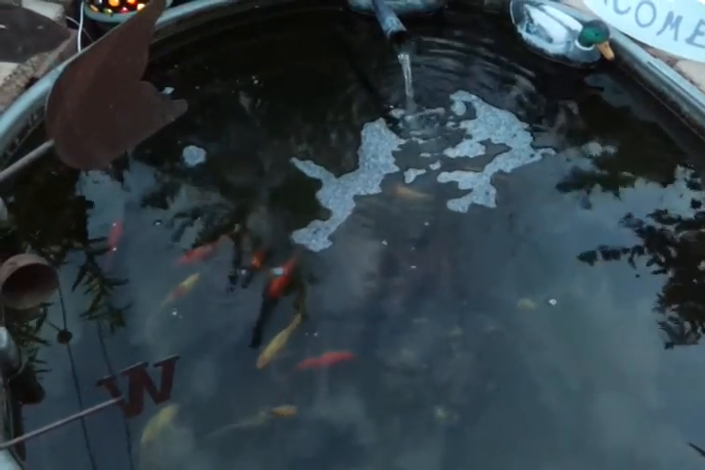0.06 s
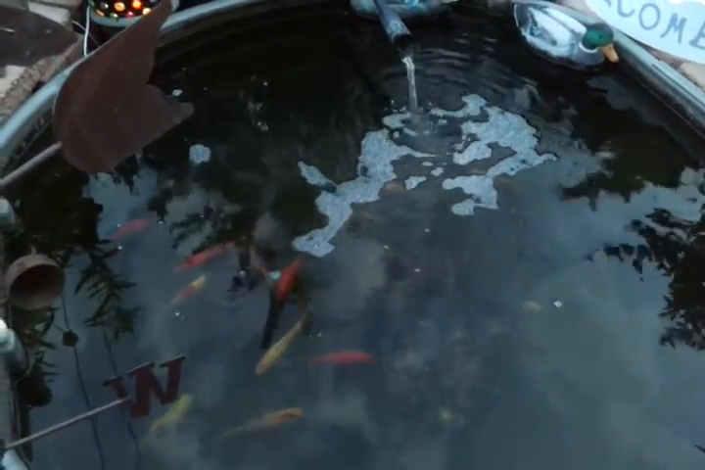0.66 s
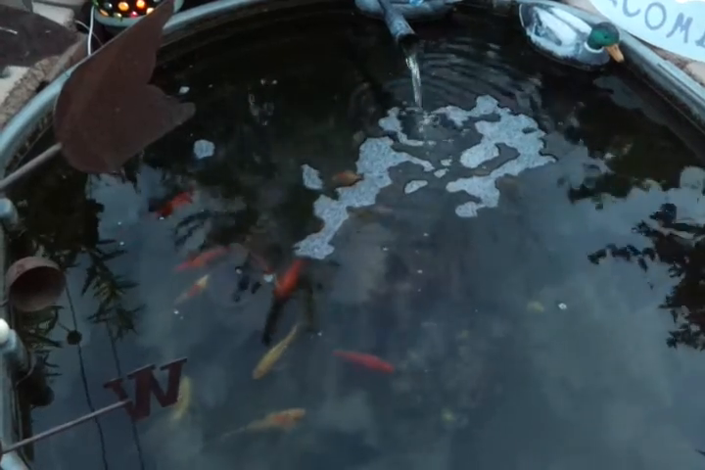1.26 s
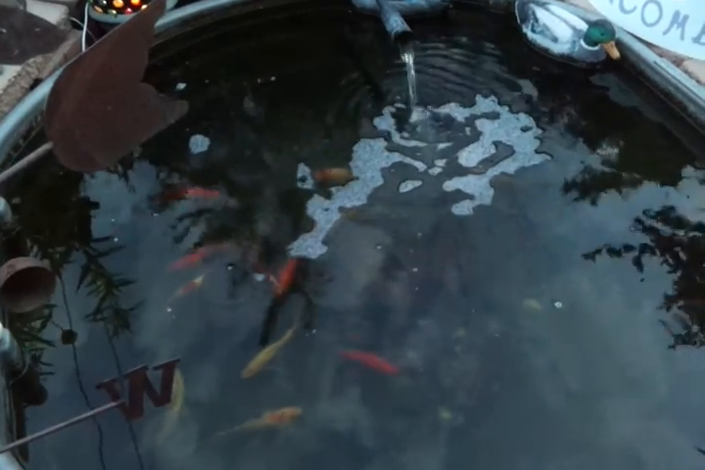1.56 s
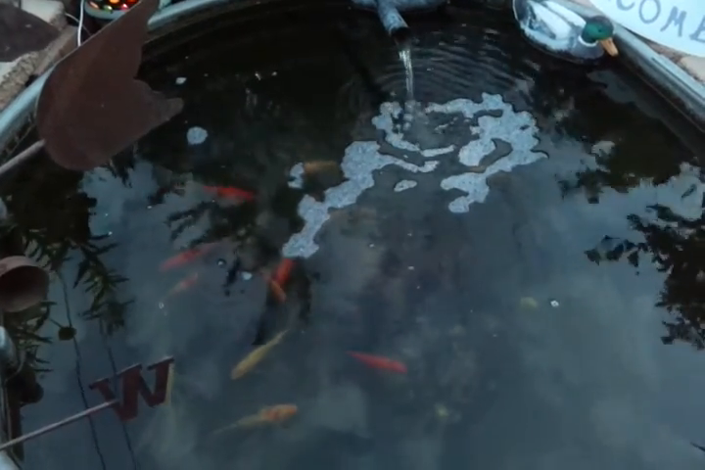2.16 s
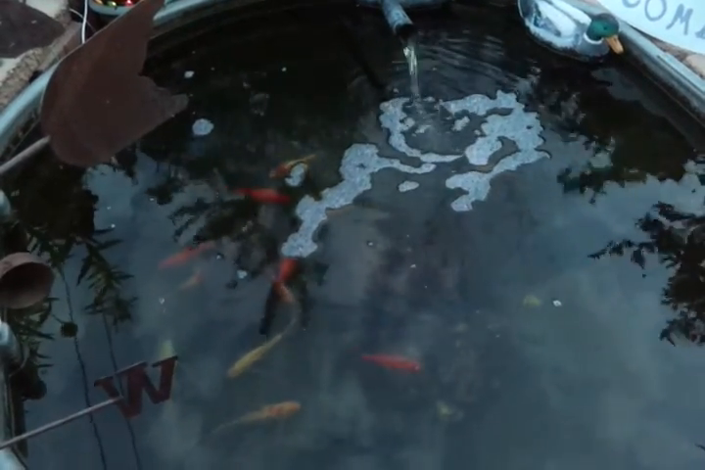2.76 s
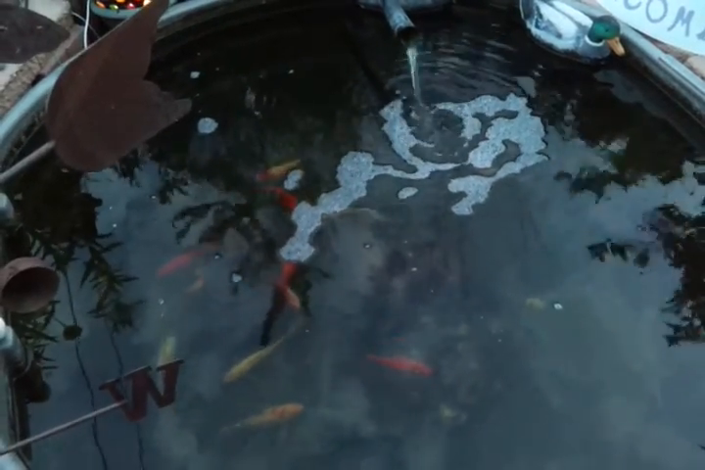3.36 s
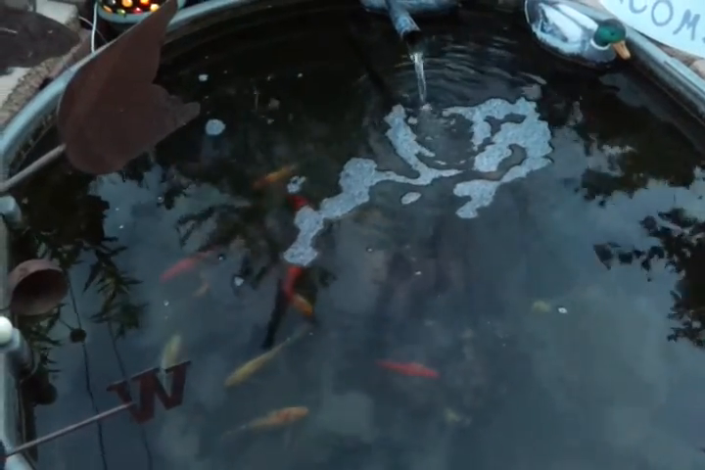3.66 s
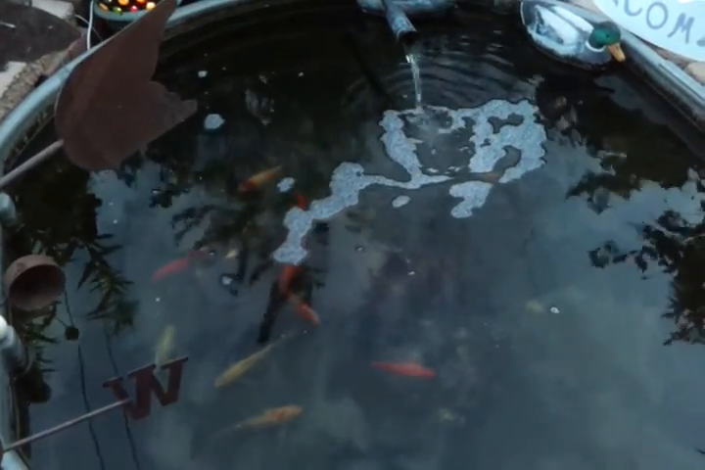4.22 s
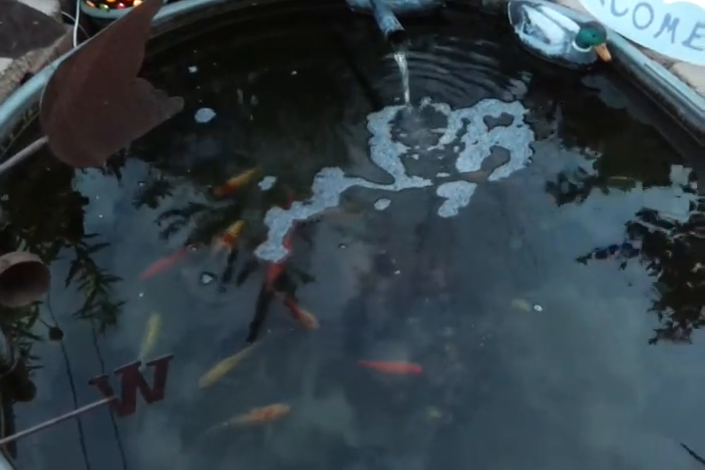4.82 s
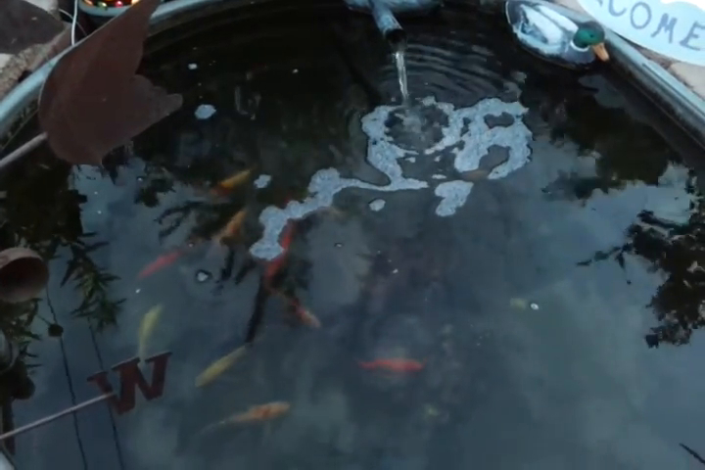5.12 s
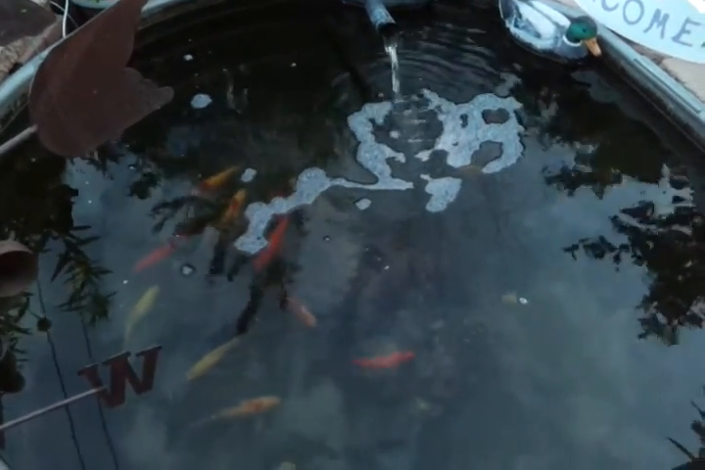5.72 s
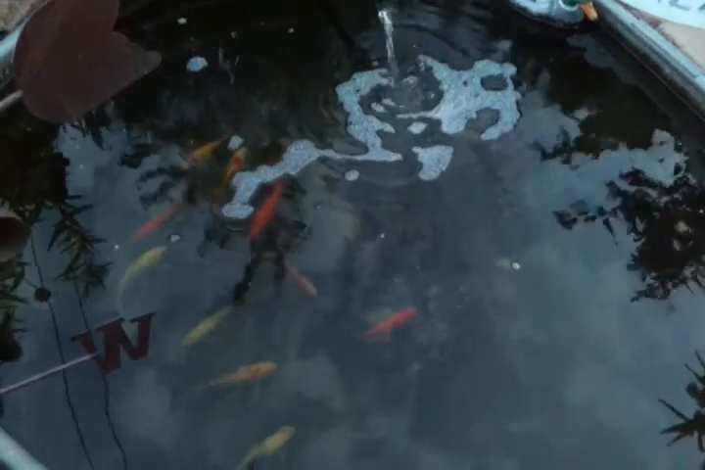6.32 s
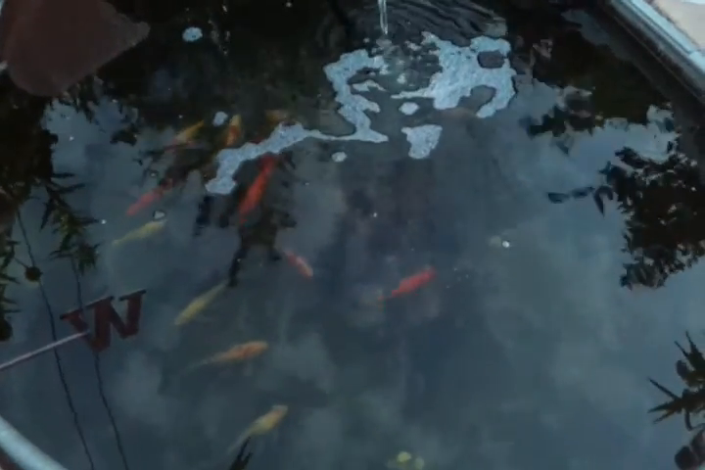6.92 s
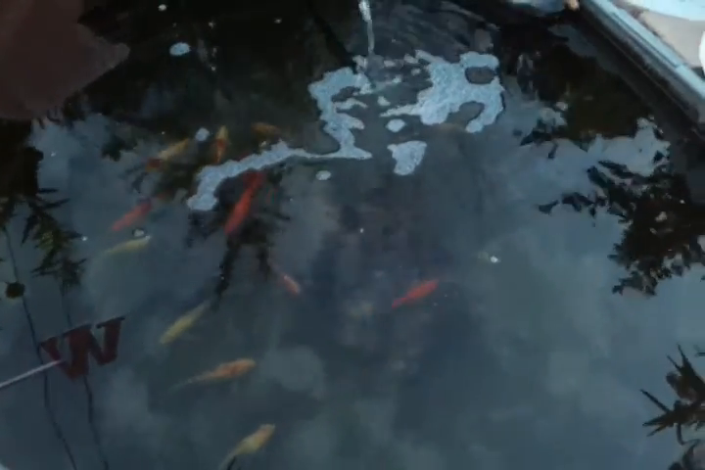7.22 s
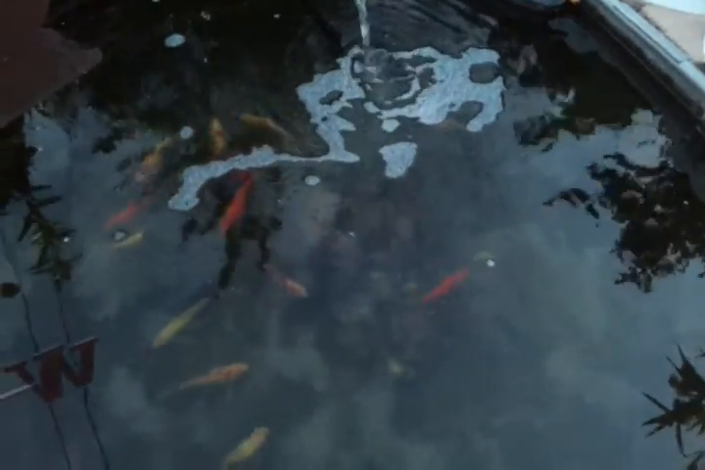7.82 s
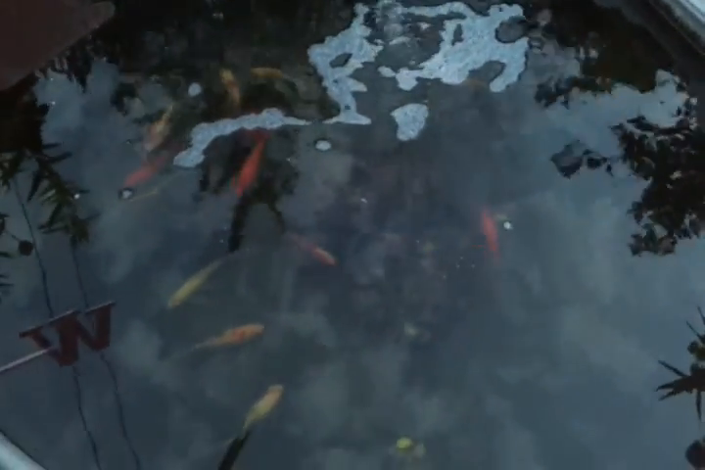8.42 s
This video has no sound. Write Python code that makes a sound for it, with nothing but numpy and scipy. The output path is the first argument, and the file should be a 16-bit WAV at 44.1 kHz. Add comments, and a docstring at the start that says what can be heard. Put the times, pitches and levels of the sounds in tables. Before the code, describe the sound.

From the start, a thin stream of water trickles from a spout into a small garden pond, close to the microphone, and runs for the whole eight and a half seconds. It breaks into irregular drops, each a light spatter with a bright, high ping; the sharpest come at about 0.8 and 1.1 seconds, with others near 3.2, 5.9 and 8.3. Small splats and lower bubbles plink and gurgle among them, rising slightly in pitch. The basin gives the water a brief, slightly hollow ring. Underneath, a pump hums quietly with a faint, steady whine in a soft outdoor rumble. From about 4 seconds a distant vehicle drones past, strongest between 4.4 and 5.2 seconds, and fades by about 6.5. The trickle carries on unchanged to the end.

```python
"""From the start a pump hums and a faint whine holds, while close by a thin stream trickles from a
spout into a small garden pond. It breaks into drops: each spatters, and a tiny bubble of air
resonates with a ping. Now and then a gulp splats, and larger bubbles plink, rising in pitch.
The basin rings and its hard rim echoes the water. Midway a far vehicle drones past and fades,
and the stream runs on."""
import sys
import numpy as np
from scipy import signal
from scipy.fft import rfft, irfft, next_fast_len
from scipy.io import wavfile
from scipy.ndimage import map_coordinates

SR = 44100
rng = np.random.default_rng(int(sys.argv[2]) if len(sys.argv) > 2 else 0)


def dump_mix(stems):
    """Bounce the given channels to the path in sys.argv[1] as a 16-bit WAV at rate SR."""
    frames = np.atleast_2d(stems).T  # one column per channel
    limited = np.clip(frames, -1, 1)  # hard clip at full scale
    pcm = np.round(limited * 32767).astype(np.int16)
    wavfile.write(sys.argv[1], SR, pcm)


N = 373968
TIME = np.arange(N) / SR

# The loudest drops; a few rows, set about 3 ms before a loud drop, give that drop's stronger lead tick # as a
# ping of its own. Each row: time in seconds, ping level in dB, ping pitch in Hz, spray level in dB, # slap
# level in dB.
DROPS = [(0.1559, -10.5, 5310, -26.5, -44), (0.184, -25.5, 5030, -41, -60), (0.218, -24.5, 5800, -48, -56),
         (0.3813, -15.5, 5550, -33, -64), (0.438, -25.5, 5750, -44, -53), (0.585, -25.5, 4500, -44, -56),
         (0.6463, -22.5, 5520, -43, -53), (0.7183, -14.5, 5650, -40, -53), (0.7716, -11.5, 5390, -36, -50),
         (0.7746, -2.5, 5870, -21.5, -42.5), (0.9, -31, 5500, -33.5, -58), (0.9722, -22, 6250, -44, -54),
         (0.9806, -22, 5270, -28.5, -43.5), (1.056, -3.5, 5540, -33, -36.5), (1.1785, -24, 5340, -39, -52),
         (1.3832, -16, 5320, -27, -43), (1.4217, -26, 5800, -34, -41.5),
         (1.5232, -25.5, 5660, -31.5, -41.5), (1.543, -27, 5250, -37, -58.5), (1.5998, -9, 5430, -34, -53),
         (1.641, -21, 5370, -49, -47), (1.844, -25.5, 5230, -34.5, -53), (1.933, -30, 5630, -35, -55),
         (2.0734, -31.5, 5550, -34.5, -40.5), (2.191, -24, 5420, -34, -45), (2.243, -29.5, 5360, -42, -56),
         (2.4004, -10.5, 5600, -31, -45), (2.443, -20.5, 5600, -47, -58), (2.461, -22.5, 5980, -41, -51),
         (2.671, -22.5, 5740, -39, -62), (2.746, -23.5, 5760, -44, -40.5), (2.784, -23.5, 5640, -39, -49),
         (2.8176, -22.5, 5400, -45, -58), (2.8204, -17, 5200, -32.5, -59),
         (2.8607, -17, 5500, -29.5, -42.5), (2.902, -27, 4680, -39, -56), (2.9254, -22, 5400, -45, -42.5),
         (2.9418, -17.5, 5400, -41, -50), (2.9733, -19, 5650, -27, -49), (2.989, -22.5, 5200, -45, -59),
         (3.0485, -24.5, 5440, -31.5, -48), (3.1272, -18.5, 4680, -32.5, -44), (3.139, -25, 5400, -33, -45),
         (3.1585, -15.5, 5860, -37, -63), (3.1976, -21, 5600, -34, -42), (3.2355, -10, 5560, -36, -45.5),
         (3.3297, -27.5, 5720, -30, -40), (3.4905, -22, 6000, -40, -63), (3.56, -20, 4560, -47, -63),
         (3.5707, -11, 5500, -48, -60), (3.6782, -23, 5840, -31.5, -47), (3.745, -26, 5700, -39, -60),
         (3.914, -30, 5300, -33, -44), (4.0406, -20, 5350, -34, -44), (4.151, -15.5, 5430, -24.5, -40.5),
         (4.2453, -24, 5500, -26.5, -45), (4.322, -26, 5560, -35, -60), (4.277, -25, 5250, -39, -61),
         (4.343, -24.5, 5430, -54, -57), (4.4079, -16, 6200, -52, -45.5), (4.485, -25.5, 5550, -36, -42),
         (4.5516, -21, 5350, -28.5, -60), (4.835, -25, 5500, -34.5, -43.5), (4.875, -27.5, 5840, -45, -53),
         (4.902, -24, 5150, -41, -43), (4.913, -24, 5900, -38, -49), (4.9689, -38, 5330, -32, -44),
         (5.026, -19, 5530, -36.5, -51), (5.074, -24, 5500, -38, -50), (5.163, -12, 5850, -28, -54),
         (5.297, -22.5, 5510, -43.5, -62), (5.395, -27, 5180, -35, -44), (5.4142, -12, 5430, -49, -49.5),
         (5.6833, -19.5, 5200, -49, -61), (5.6869, -10, 5440, -26, -50), (5.737, -29.5, 5950, -40, -47),
         (5.821, -17.5, 5010, -31, -44.5), (5.865, -25, 5850, -34, -57), (5.8777, -8.5, 5430, -30, -44),
         (5.9146, -30, 5850, -45, -64), (6.0083, -22, 4800, -34, -45), (6.038, -20.5, 5150, -33, -40.5),
         (6.0506, -26, 5600, -38, -66), (6.162, -21, 5380, -46, -43), (6.303, -30, 5630, -40, -43),
         (6.3768, -22, 5170, -26.5, -42), (6.454, -24, 5260, -37.5, -54), (6.6051, -21, 5390, -27.5, -58),
         (6.6121, -18.5, 5100, -26, -54), (6.797, -30.5, 5370, -36.5, -47), (6.832, -24.5, 5200, -42, -64),
         (6.8502, -16.5, 5270, -31, -47), (7.1675, -18.5, 5290, -30.5, -48.5),
         (7.2232, -23.5, 5014, -33, -57), (7.242, -20.5, 5140, -27, -53), (7.3148, -14.5, 5160, -41, -54),
         (7.3478, -15, 5100, -33, -63), (7.4146, -16.5, 5760, -52, -41.5), (7.47, -15, 5320, -28, -47),
         (7.5, -27, 5730, -41, -41.5), (7.618, -29, 5350, -38, -46), (7.8389, -13.5, 5500, -63, -44),
         (7.932, -27, 5670, -47, -53), (8.044, -20, 5200, -55, -54), (8.229, -18, 4910, -44, -42),
         (8.2812, -8, 5540, -29, -58)]
# Spectrum of water slapping water. Each row: frequency in Hz, gain in dB.
SLAP_SPECTRUM = [(150, -12), (400, -6), (780, 2), (1100, 2), (1290, -7.5), (1500, 1.5), (2100, -1),
                 (2450, 1.5), (2750, -9), (3300, -0.5), (3900, -2), (4800, -18), (7000, -39.5)]


def gain_of(db):
    """Decibels to amplitude."""
    return 10 ** (np.asarray(db) / 20)


def unit_rms(x):
    """Normalisation to rms 1."""
    return x / np.sqrt(np.mean(x ** 2) + 1e-20)


def curves(rows):
    """Linear interpolation of a table through time."""
    s, *columns = np.transpose(rows)
    return [np.interp(TIME, s, c) for c in columns]


def add(mix, s, sound):
    """Superposition: a sound joins the mix from second s."""
    part = mix[max(round(s * SR), 0):][:len(sound)]
    part += sound[:len(part)]


def coloured(x, points):
    """Spectral shaping by (Hz, dB) points."""
    hz, db = np.transpose(points)
    size = next_fast_len(len(x))
    f = np.fft.rfftfreq(size, 1 / SR)
    response = gain_of(np.interp(np.log(f + 1), np.log(hz), db))
    return irfft(rfft(x, size) * response, size)[:len(x)]


def wander(hz):
    """Low-pass noise of rms 1 and bandwidth about hz."""
    size, rate_hz = 8192, 800
    f = np.fft.rfftfreq(size, 1 / rate_hz)
    slow = irfft(rfft(rng.standard_normal(size)) * np.exp(-.5 * (f / hz) ** 2))
    return unit_rms(np.interp(TIME, np.arange(size) / rate_hz, slow))


def wavering_tone(hz, width_hz, flutter_db):
    """Random modulation of pitch and strength broadens a spectral line."""
    phase = 2 * np.pi * np.cumsum(hz + 0.403 * width_hz * wander(width_hz)) / SR
    return unit_rms(gain_of(flutter_db * wander(width_hz)) * np.sin(phase))


def background(air_db=-50, whine_hz=1767, whine_db=-64):
    """Line spectra over broadband noise: the pump's hum and a thin whine in the outdoor rumble."""
    # Each row: frequency in Hz, gain in dB.
    air_spectrum = [(20, -16.5), (32, -14.5), (45, 0.5), (62, -2), (90, 2), (110, -3.5), (145, -1.5),
                    (235, -5), (290, -8.5), (400, -10.5), (600, -16.5), (1200, -17.5), (3000, -29),
                    (6000, -41.5), (7500, -55.5)]
    # Each row: frequency in Hz, line width in Hz, rms level in dB.
    pump_tones = [(46.6, 4, -66), (75.8, 2.94, -50.5), (119.4, 5, -60), (152, 6.2, -62.5),
                  (169.7, 4.1, -64), (235.6, 2, -62)]
    air = gain_of(air_db) * unit_rms(coloured(rng.standard_normal(N), air_spectrum))
    hum = sum(gain_of(db) * wavering_tone(hz, width, flutter_db=2.0) for hz, width, db in pump_tones)
    whine = np.sqrt(2) * np.sin(2 * np.pi * whine_hz * TIME + 0.72 * wander(1.8))
    return air + hum + gain_of(whine_db) * whine


def impacts(per_s, spread_db):
    """Shot noise: random clicks of either sign, many small and a few large."""
    when, sign, size = rng.random((round(per_s * N / SR), 3)).T
    db = spread_db * np.minimum(-np.log(1 - size), 3.5)
    out = np.zeros(N)
    out[(when * N).astype(int)] = np.sign(sign - .5) * gain_of(db)
    return out


def ring(hz, peak_s, rise_per_s=0, order=2):
    """Bubble resonance: trapped air acts as a spring, and its pitch may climb as it nears the surface."""
    t = np.arange(0, 8 * peak_s, 1 / SR)
    age = t / peak_s
    envelope = (age * np.exp(1 - age)) ** order
    return envelope * np.sin(2 * np.pi * hz * (t + rise_per_s * t ** 2 / 2))


def pings(per_s=480, pitch_hz=(4100, 5250, 6500), spread_db=3.6, rise_per_s=5):
    """Tiny bubbles resonate, each at its own pitch, so densely that they fuse."""
    out = np.zeros(N)
    for when, a, b, size, length, glide in rng.random((round(per_s * N / SR), 6)):
        hz = np.interp((a + b) / 2, [0, .5, 1], pitch_hz)
        swell_s = .0006 * 4 ** length
        gain = gain_of(-spread_db * np.log(0.049 + size)) / swell_s ** 0.097
        add(out, when * N / SR, gain * ring(hz, swell_s, rise_per_s * glide ** 2, order=3))
    return unit_rms(out)


def plink(hz, cycles, rise, onset_s=.0013, wobble_db=2.0, wobble_cycles=9):
    """Damped oscillation: a larger bubble pinches off, glides up and flutters as its shape wobbles."""
    n = np.arange(0, 5 * cycles, hz / SR)  # time in periods
    pace, start = rng.random((2, 3, 1))
    wobble = np.sin(2 * np.pi * (n / wobble_cycles * (.5 + pace) + start)).sum(0)
    onset = 1 - np.exp(-(n / hz / onset_s) ** 2)
    envelope = gain_of(wobble_db * wobble) * onset * np.exp(-n / cycles)
    return envelope / envelope.max() * np.sin(2 * np.pi * n * (1 + rise * n / cycles / 2))


def gurgle(per_s=190, spread_db=4.5, cycles=11, candidates=4000):
    """Weak bubbles of all sizes churn under the stream: the larger, the lower the resonance."""
    # Each row: share of bubbles below this pitch, pitch in Hz, relative level in dB.
    bubble_sizes = [(0, 480, -5), (.15, 850, -3), (.27, 1100, -3), (.37, 1600, -2), (.48, 2150, 1),
                    (.64, 2500, 3), (.77, 2900, 2), (.92, 3400, 3), (1, 4300, 3)]
    share, pitch_hz, size_db = np.transpose(bubble_sizes)
    out = np.zeros(N)
    for when, which, size, length, glide, chance in rng.random((candidates, 6)):
        if chance < per_s * N / SR / candidates:
            db = np.interp(which, share, size_db) - spread_db * np.log(0.16 + size)
            hz = np.interp(which, share, pitch_hz)
            add(out, when * N / SR, gain_of(db) * plink(hz, cycles * (.5 + length), 0.085 * glide ** 3))
    return unit_rms(out)


def trickle(fizz_db=-4.5, ping_db=-1.2, patter_db=-7.5, gurgle_db=-6.0, clump_db=5.5, clump_hz=40):
    """Amplitude modulation: as the stream wobbles, droplets tick, patter and ping in clumps."""
    # Each row: time in seconds, level of fizz and pings in dB, level of patter and gurgle in dB.
    flow = [(0.0, -45, -51.5), (0.54, -45.5, -48), (1.46, -46, -50.5), (1.67, -49, -54), (2.19, -48, -48.5),
            (2.63, -45, -50), (3.04, -46, -50), (3.36, -48, -49.5), (6.9, -46, -50), (7.46, -43.5, -48),
            (7.65, -46, -48.5), (8.45, -45.5, -51)]
    # Each row: frequency in Hz, gain in dB.
    fizz_spectrum = [(2000, -42.5), (3800, -38), (4400, 3), (5000, 2), (5600, 6.5), (6200, 0.5), (6800, -4),
                     (7600, -16.5)]
    high_db, low_db = curves(flow)
    clumps = gain_of(clump_db * np.clip(wander(clump_hz), -2, 1))
    fizz = unit_rms(coloured(impacts(per_s=2200, spread_db=2.0) * clumps, fizz_spectrum))
    patter = unit_rms(coloured(impacts(per_s=1000, spread_db=1.4) * clumps, SLAP_SPECTRUM))
    high = gain_of(fizz_db) * fizz + gain_of(ping_db) * unit_rms(pings() * clumps)
    low = gain_of(patter_db) * patter + gain_of(gurgle_db) * gurgle()
    return gain_of(high_db) * high + gain_of(low_db) * low


def spatter(pitch_hz, ring_s, scatter_s, count):
    """A cluster of tiny bubble resonances within milliseconds, the late ones weaker."""
    out = np.zeros(SR // 20)
    for a, b, size, pitch, length in rng.uniform(.03, 1, (count, 5)):
        hz = np.interp(pitch, [0, .5, 1], pitch_hz)
        delay_s = -scatter_s * np.log(a * b)
        add(out, delay_s, size * (a * b) ** 0.077 * ring(hz, ring_s * (.5 + length)))
    return out / np.sqrt(np.sum(out ** 2) / 400)  # the energy of 9 ms at rms 1


def small_drops(drip_s=.09, ping_db=-28.5, spray_db=-43, slap_db=-52, spread_db=2.0, ping_hz=5450):
    """Jet breakup sheds a drop about every drip_s: rows for the lesser ones between those of DROPS."""
    loud = [0] + [row[0] for row in DROPS] + [N / SR]
    times = np.concatenate([np.linspace(a, b, round((b - a) / drip_s) + 1)[1:-1]
                            for a, b in zip(loud, loud[1:])])
    deviations = rng.standard_normal((len(times), 5)).clip(-2, 2)
    return [(s + 0.32 * drip_s * late, ping_db + spread_db * ping, ping_hz * (1 + 0.05 * pitch),
             spray_db + spread_db * spray, slap_db + spread_db * slap)
            for s, (late, ping, pitch, spray, slap) in zip(times, deviations)]


def drops(ping_db=-2.1, spray_db=-2.6, slap_db=-6.5, tick_db=-18, hard_db=-13):
    """Transients: each drop gives a faint tick, a slap and a spray, then a louder ping 3 ms later."""
    lead_s, tick_s, splash_s, snap_s = .003, .0005, .0023, .00078
    out, t = np.zeros(N), np.arange(SR // 20) / SR
    push = t / splash_s * np.exp(-t / splash_s)
    push /= np.sqrt(np.mean(push[:400] ** 2))
    for s, peak_db, hz, bright_db, dull_db in list(DROPS) + small_drops():
        length, force, tone = 1 + .22 * rng.uniform(-1, 1, 3)
        swell_s = length * snap_s * (1 + max(hard_db - peak_db, 0) / 20)  # gentle drops ring longer
        slap = 1.37 * push * unit_rms(coloured(rng.standard_normal(len(t)), SLAP_SPECTRUM))
        slap += 0.57 * spatter([1700, 2900, 4000], ring_s=.0012, scatter_s=splash_s, count=4)
        # the bubbles of one drop are alike in size
        spray = spatter([hz - 900, hz + 50, hz + 950], ring_s=.00078, scatter_s=splash_s, count=11)
        tick = force ** 2 * ring(hz * np.sqrt(tone), tick_s, order=4)
        ping = ring(hz, swell_s, rise_per_s=3.3, order=5)
        add(out, s - lead_s - tick_s, gain_of(peak_db + tick_db) * tick)
        add(out, s - lead_s, gain_of(dull_db + slap_db) * slap)
        add(out, s - lead_s, gain_of(bright_db + spray_db) * spray)
        add(out, s - swell_s, gain_of(peak_db + ping_db) * ping)
    return out


def splats(level_db=-2, spread=0.28):
    """Each gulp entrains a dense cloud of bubbles that resonate around a middle pitch."""
    # Each row: start in seconds, level in dB, middle pitch in Hz.
    gulps = [(0.092, -44, 3920), (0.734, -44.5, 3340), (1.378, -40, 3470), (2.971, -34, 4130),
             (3.044, -38.5, 3430), (3.568, -47, 2970), (4.148, -37, 3330), (5.863, -36, 3700),
             (6.007, -35.5, 3630), (6.603, -36.5, 3240), (6.77, -42.5, 2929), (7.218, -40, 3350),
             (7.23, -45, 3080), (7.499, -41, 2860), (8.28, -41, 3770)]
    out = np.zeros(N)
    for s, db, hz in gulps:
        pitch_hz = [hz * (1 - spread), hz, hz * (1 + spread)]
        cloud = spatter(pitch_hz, ring_s=.0005, scatter_s=.0018, count=14)
        add(out, s, gain_of(db + level_db) * cloud)
    return out


def large_bubbles(level_db=-2.0, fragment_db=-12, scatter_s=.012, spread_octaves=.33, life=.6):
    """Fragmentation: each large bubble plinks and sheds four short-lived ones of nearby pitch."""
    # Each row: start in seconds, level in dB, starting pitch in Hz, decay time in ms,
    # share by which the pitch rises in that time.
    bubbles = [(0.15, -35, 3330, 3, 0.027), (0.198, -38, 1580, 3.5, .05), (0.199, -34.5, 2200, 3.5, 0.033),
               (0.24, -36.5, 1350, 6.7, .04), (0.312, -41, 2930, 4, 0.024),
               (0.696, -35.5, 1060, 4.4, 0.039), (0.756, -45, 990, 7.3, .02), (0.9, -39, 3100, 3, 0.026),
               (1.178, -37, 2300, 2.6, .03), (0.766, -29, 2225, 4.7, 0.033), (0.951, -40, 2440, 3.7, .03),
               (0.974, -34, 2340, 3.1, 0.038), (1.053, -37, 950, 6, 0.053),
               (1.269, -38.5, 1040, 4.9, 0.034), (1.383, -28.5, 3170, 3.3, 0.027),
               (1.594, -32.5, 2830, 3.2, .03), (1.624, -34, 2320, 3.5, .02), (1.64, -28.5, 2315, 4, .01),
               (1.848, -36.5, 2220, 4.3, 0.038), (1.887, -31.5, 3300, 2.6, 0.015),
               (1.9, -37, 2380, 5.4, 0.047), (2.072, -36, 790, 9.7, 0.15), (2.266, -38, 2280, 3.7, 0.03),
               (2.348, -37.5, 940, 5.5, 0.13), (2.46, -32, 2290, 2.9, 0.034), (2.55, -36, 3450, 2, 0.032),
               (2.757, -38, 2340, 4, 0.033), (3.045, -31, 2270, 2.9, 0.032), (3.319, -37, 2310, 3.1, 0.044),
               (3.448, -36, 2340, 3, 0.044), (3.862, -36.5, 2510, 9.1, 0.075),
               (4.084, -34.5, 2320, 6.5, 0.045), (4.091, -30, 2940, 4.5, 0.024),
               (4.148, -28, 3140, 2.2, .03), (4.151, -37, 2270, 6, 0.021), (4.245, -34, 2280, 3, .03),
               (4.395, -36, 2250, 4.4, .03), (4.405, -28.5, 2090, 4, 0.044), (4.606, -32, 2140, 4.8, 0.04),
               (4.8, -43.5, 793, 7.8, 0.13), (4.876, -33.5, 2926, 3, 0.028), (4.947, -35, 2740, 4, .03),
               (4.988, -37.5, 2350, 4, .04), (5.081, -37.5, 1516, 7.9, 0.08),
               (5.091, -39, 1035, 4.6, 0.048), (5.117, -41, 944, 7.4, 0.067),
               (5.297, -33.5, 2240, 5.3, 0.068), (5.398, -38, 1970, 5, 0.027),
               (5.508, -38, 2330, 4.3, 0.035), (5.52, -38, 2240, 3, 0.034), (5.52, -37.5, 1550, 4, .04),
               (5.668, -34, 2000, 6, 0.1), (5.699, -39, 1090, 7.2, .03), (5.716, -35.5, 2370, 4.5, 0.035),
               (5.867, -27, 3330, 3.5, 0.027), (5.921, -32.5, 2400, 3.3, 0.035),
               (5.999, -29, 2420, 2.7, 0.036), (6.104, -35, 2400, 6.4, 0.037), (6.302, -37, 2290, 3.5, .04),
               (6.516, -34, 2950, 5.3, .04), (6.533, -29.5, 2010, 2.9, 0.07),
               (6.603, -30, 2370, 4.7, 0.046), (6.754, -35, 2020, 5.7, 0.068), (6.77, -37, 2320, 4, 0.046),
               (6.865, -31.5, 3140, 2.4, .03), (6.993, -40, 1037, 6.1, 0.071),
               (7.092, -24.5, 2430, 4.4, 0.02), (7.101, -42.5, 734, 6.2, 0.11),
               (7.313, -38.5, 1010, 5.5, 0.11), (7.472, -37.5, 760, 6.4, 0.033),
               (7.555, -31.5, 1563, 8.7, 0.1), (7.628, -39, 1940, 4.4, .04),
               (7.636, -40.5, 1080, 6.4, 0.069), (7.717, -36, 990, 9.6, 0.21), (7.731, -41, 1330, 8, 0.19),
               (7.823, -37, 1355, 6.9, 0.053), (7.837, -41, 1950, 3.6, 0.042),
               (7.919, -30, 2010, 2.3, 0.059), (7.921, -35, 2570, 1.7, .03),
               (8.052, -38.5, 920, 5.2, 0.031), (8.223, -36, 565, 7.7, 0.036), (8.26, -36, 1980, 6, 0.051),
               (8.282, -29.5, 1430, 5, 0.05), (8.37, -43, 620, 19, 0.29), (8.383, -46, 778, 13.4, 0.22)]
    out = np.zeros(N)
    for s, db, hz, decay_ms, rise in bubbles:
        cycles = hz * decay_ms / 1000
        add(out, s, gain_of(db + level_db) * plink(hz, cycles, rise))
        for late, pitch in rng.random((4, 2)):
            fragment = plink(hz * 2 ** (spread_octaves * (2 * pitch - 1)), life * cycles, life * rise)
            add(out, s + scatter_s * (late - .2), gain_of(db + fragment_db) * fragment)
    return out


def basin(x):
    """Cavity resonance: the hollow between water and rim rings briefly at a few pitches."""
    # Each row: frequency in Hz, bandwidth in Hz, level against the direct sound in dB.
    modes = [(790, 74, -8.5), (1110, 120, -7), (2065, 60, -5), (2314, 120, -1), (3000, 150, -12.5),
             (3250, 170, -7), (4390, 110, -10.5), (4620, 100, -15)]
    return x + sum(gain_of(db) * signal.lfilter(*signal.iirpeak(hz, hz / width, fs=SR), x)
                   for hz, width, db in modes)


def diffuse_tail(t, db, t60_s, start_s):
    """Reverberation as exponentially decaying noise."""
    tail = rng.standard_normal(len(t)) * 1000 ** (-t / t60_s) * (t > start_s)
    return gain_of(db) * tail / np.linalg.norm(tail)


def reflections(x, ripple_s=.000045, ripple_hz=9):
    """Multipath: the direct sound, plus echoes and scatter that waver with the rippling surface."""
    # Rim and surroundings. Each row: delay in ms, amplitude gain.
    echoes = [(3.01, 0.18), (8.8, 0.04), (26.1, 0.04)]
    # Scatter inside the pond. Each row: frequency in Hz, gain in dB.
    scatter_spectrum = [(300, -2.5), (1000, -1.5), (2400, -2.5), (3500, 6), (5000, 3), (7000, -6)]
    t, out = np.arange(SR // 2) / SR, x.copy()
    for ms, gain in echoes:
        emitted_s = TIME - ms / 1000 - ripple_s * wander(ripple_hz)
        out += gain * map_coordinates(x, [emitted_s * SR], order=3)
    shares = np.array([wander(ripple_hz) for _ in range(5)])
    for share in shares / np.linalg.norm(shares, axis=0):  # tails crossfade at constant power
        pond = coloured(diffuse_tail(t, db=-13, t60_s=.049, start_s=.001), scatter_spectrum)
        garden = diffuse_tail(t, db=-14, t60_s=.13, start_s=.008)
        out += signal.oaconvolve(x * share, pond * (t < t[-1] / 2) + garden)[:N]
    return out


def passing(nearest_s, width_s, falloff=2.1):
    """Power-law loss with distance from a source on a straight path: gain 1 when nearest."""
    return np.hypot(1, (TIME - nearest_s) / width_s) ** -falloff


def vehicle(roar_db=-51.0, blur_hz=9.6):
    """A far engine revs and eases off as it passes: its harmonics boom in turn over a dull roar."""
    # Each row: time in seconds, engine speed in Hz.
    engine_speed = [(3.9, 37.7), (4.3, 39.5), (4.58, 45.27), (5.15, 42.66), (6.3, 40.2)]
    # Each row: multiple of the engine speed, peak time in seconds, rms level there in dB,
    # half-width of the swell in seconds.
    harmonics = [(4, 4.37, -46.5, 0.12), (5, 4.55, -48.5, 0.39), (4, 5.14, -43, 0.45), (4, 6.25, -54, 0.22)]
    speed_hz, = curves(engine_speed)
    roar_spectrum = [(80, -24.5), (150, -9.0), (225, 1.0), (290, -15.5), (410, -15.0), (700, -39.5)]
    roar = unit_rms(coloured(rng.standard_normal(N), roar_spectrum))
    notes = sum(gain_of(db) * passing(s, width_s)
                * wavering_tone(multiple * speed_hz, blur_hz, flutter_db=3.0)
                for multiple, s, db, width_s in harmonics)
    return notes + gain_of(roar_db) * passing(nearest_s=4.7, width_s=1.1) * roar


def scene():
    """Superposition of the neighbourhood and the water in its pond."""
    neighbourhood = background() + vehicle()
    water = drops() + splats() + large_bubbles() + trickle()
    return (neighbourhood + reflections(basin(water)))[None]


def record(dry, cutoff_hz=7600):
    """Low-pass filtering: a small microphone dulls the treble, then the band ends steeply."""
    # Each row: frequency in Hz, gain in dB.
    microphone_response = [(20, 1.5), (5900, 0), (6500, -3), (6900, -1), (7200, -5.5), (7600, -7)]
    heard = coloured(dry[0], microphone_response)
    low_pass = signal.firwin(255, cutoff_hz, window=("kaiser", 8), fs=SR)
    return signal.oaconvolve(heard, low_pass, "same")[None]


dry = scene()
out = record(dry)
dump_mix(out)
```